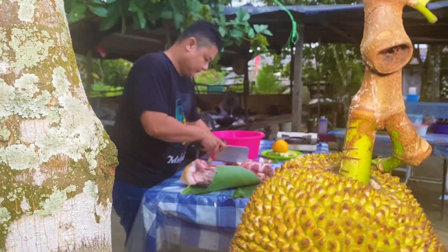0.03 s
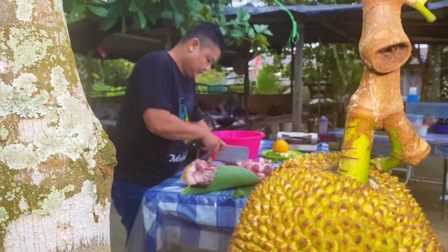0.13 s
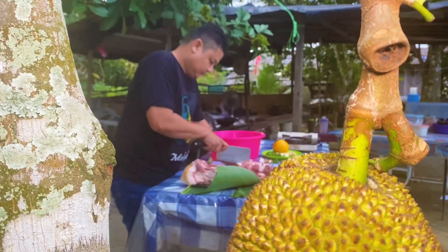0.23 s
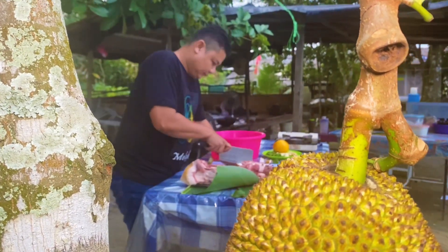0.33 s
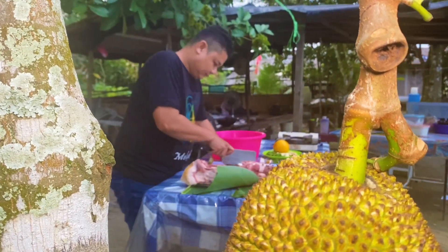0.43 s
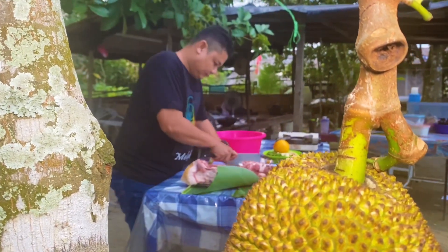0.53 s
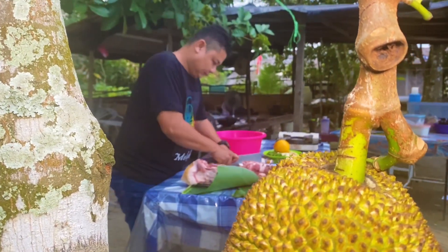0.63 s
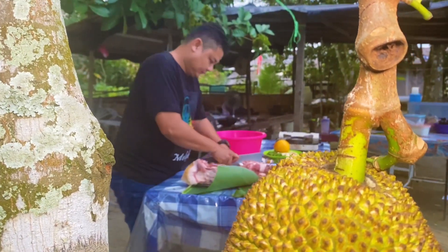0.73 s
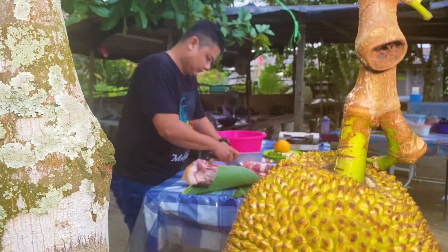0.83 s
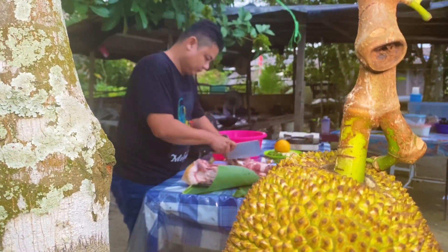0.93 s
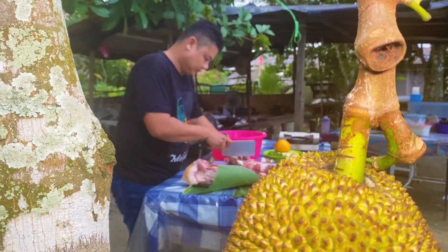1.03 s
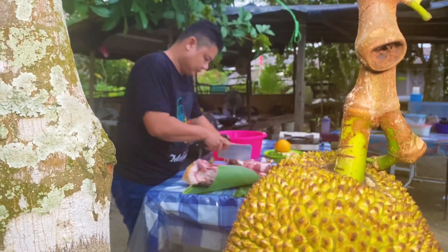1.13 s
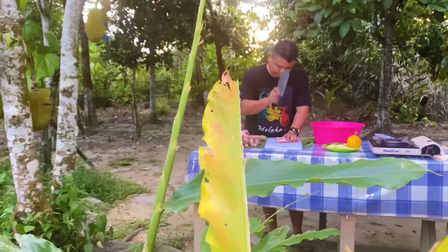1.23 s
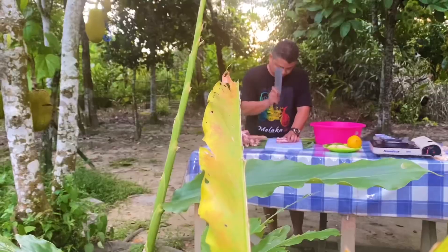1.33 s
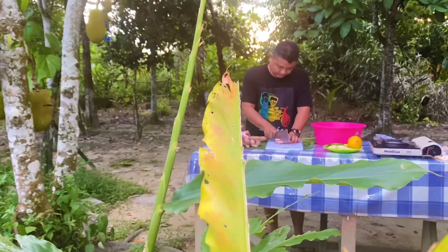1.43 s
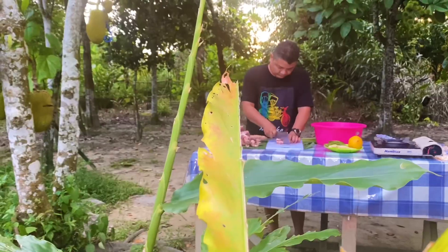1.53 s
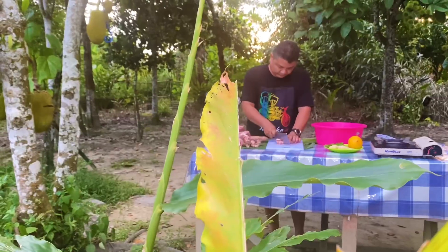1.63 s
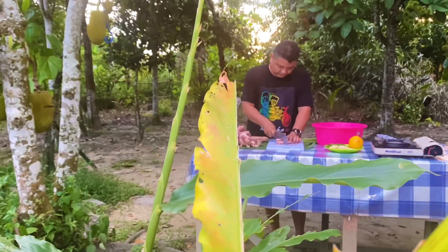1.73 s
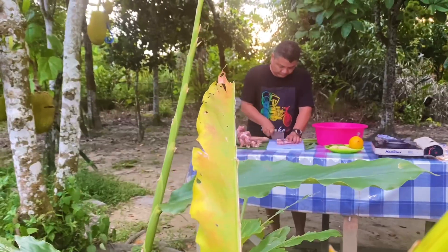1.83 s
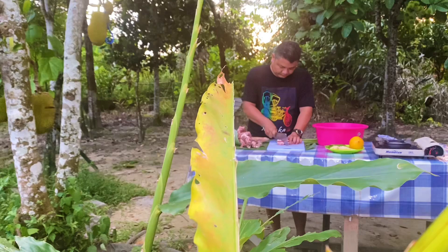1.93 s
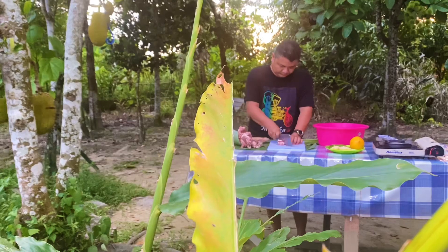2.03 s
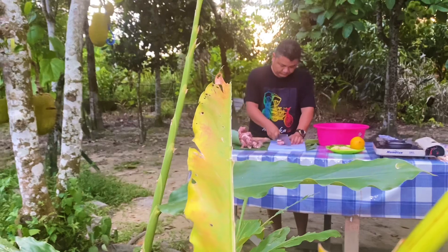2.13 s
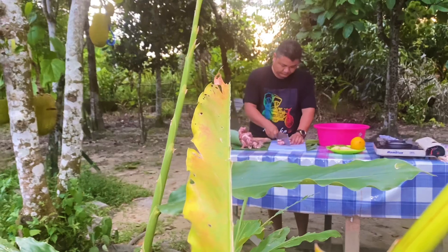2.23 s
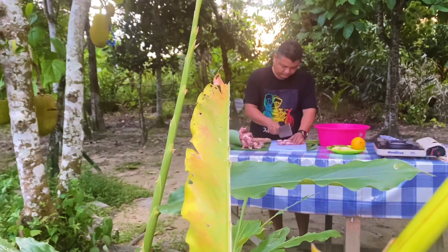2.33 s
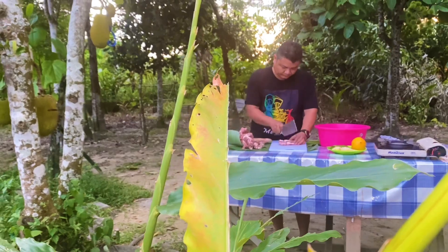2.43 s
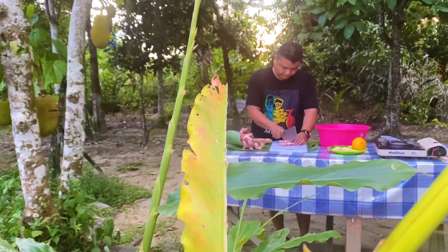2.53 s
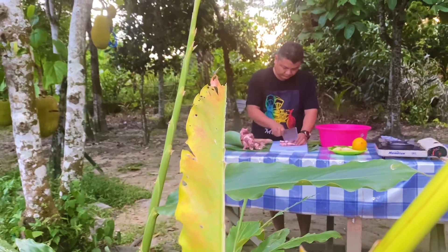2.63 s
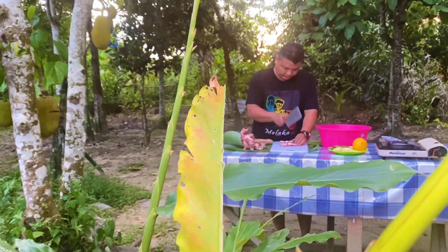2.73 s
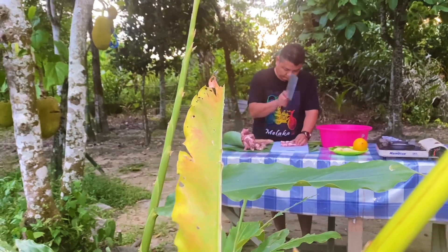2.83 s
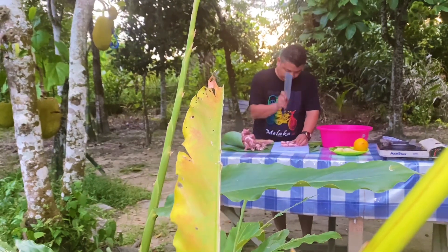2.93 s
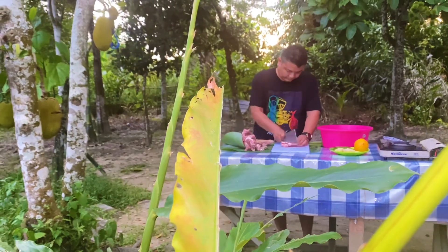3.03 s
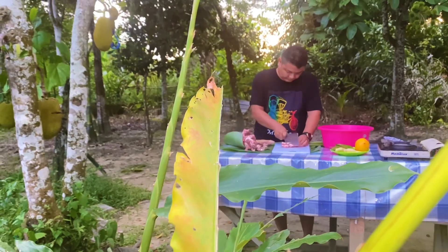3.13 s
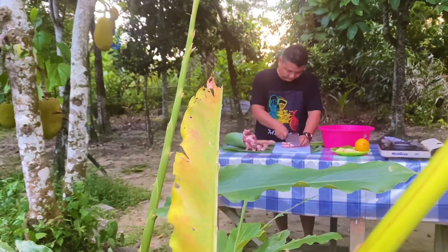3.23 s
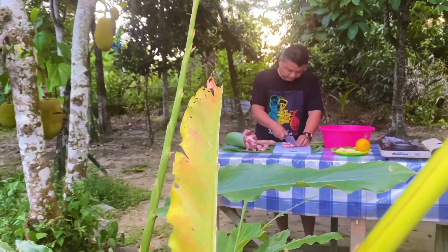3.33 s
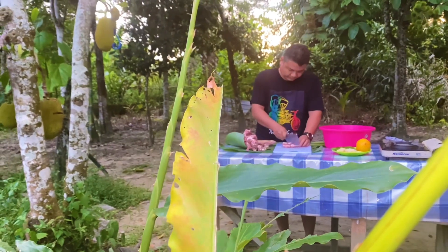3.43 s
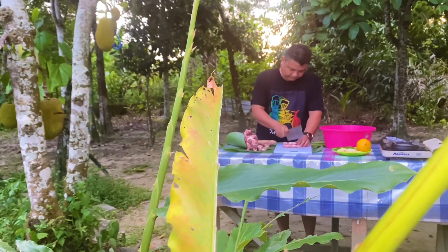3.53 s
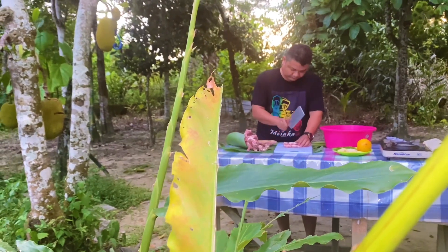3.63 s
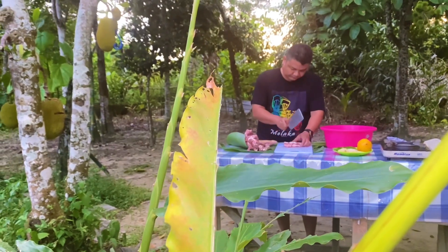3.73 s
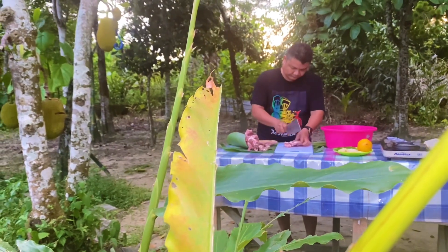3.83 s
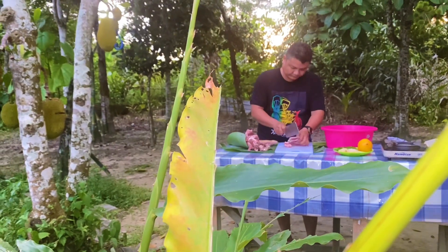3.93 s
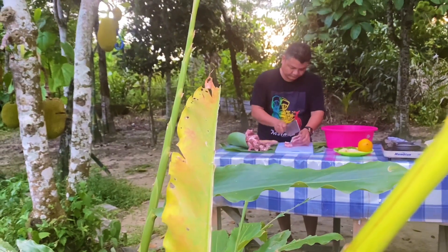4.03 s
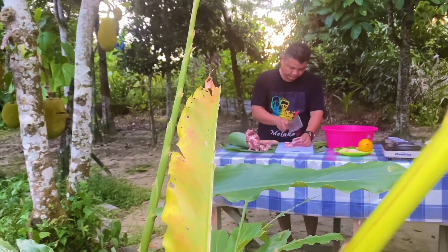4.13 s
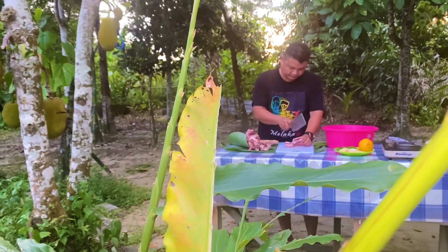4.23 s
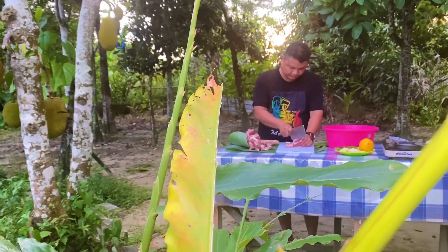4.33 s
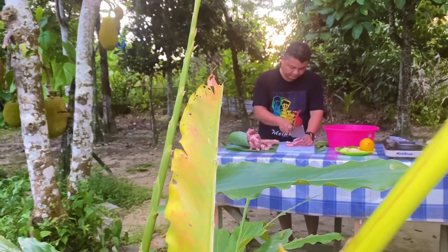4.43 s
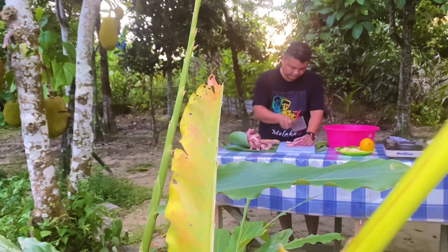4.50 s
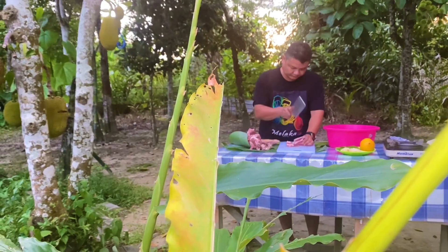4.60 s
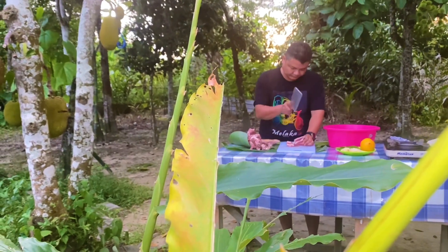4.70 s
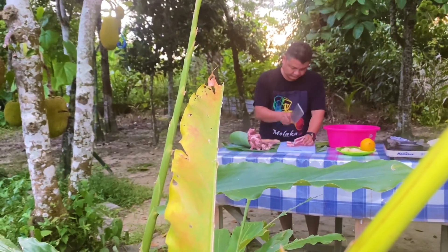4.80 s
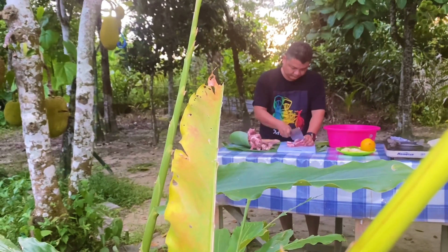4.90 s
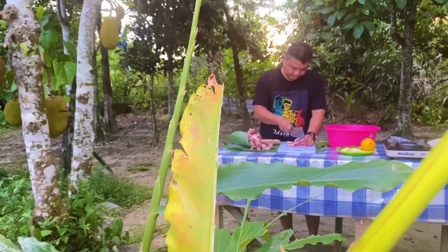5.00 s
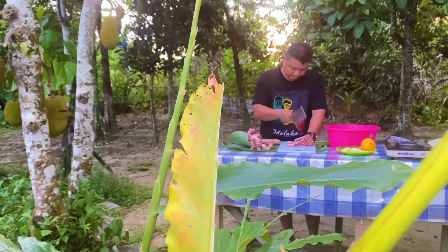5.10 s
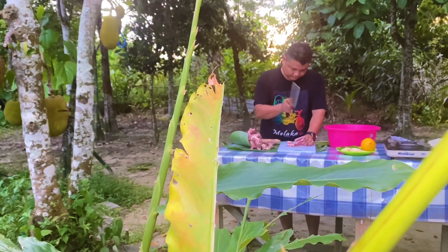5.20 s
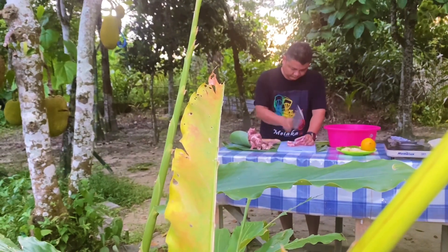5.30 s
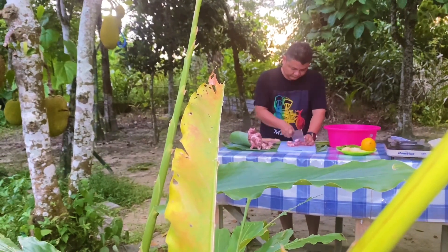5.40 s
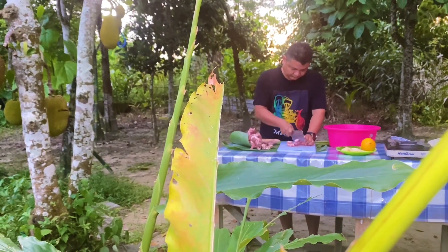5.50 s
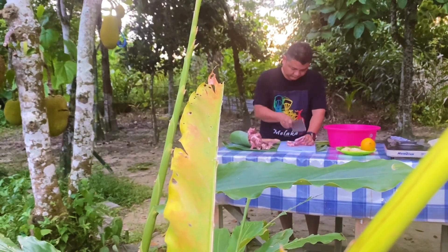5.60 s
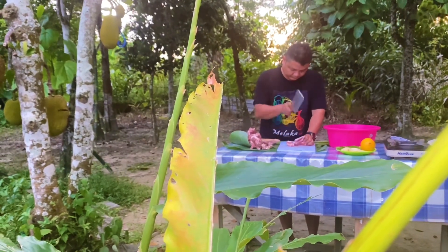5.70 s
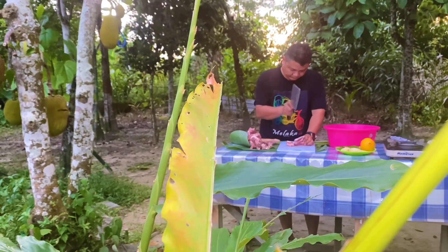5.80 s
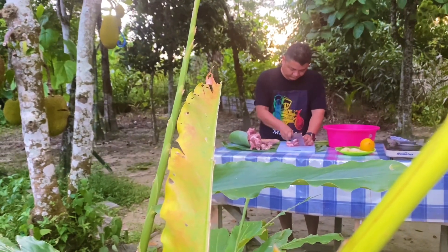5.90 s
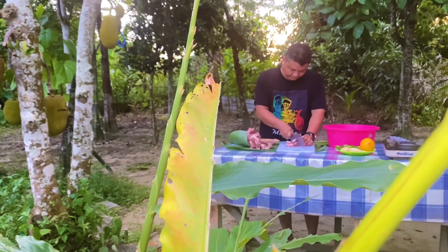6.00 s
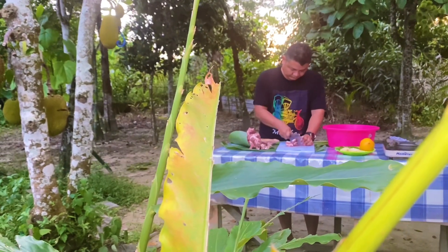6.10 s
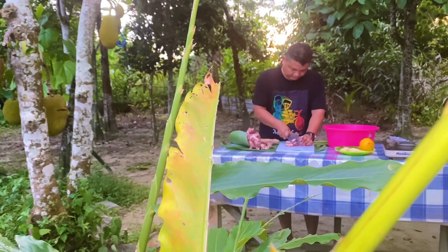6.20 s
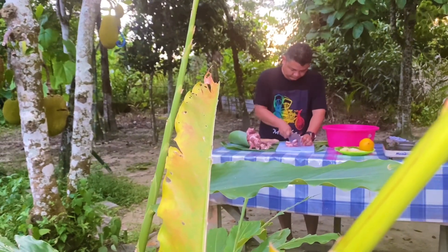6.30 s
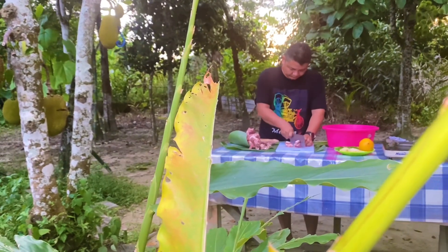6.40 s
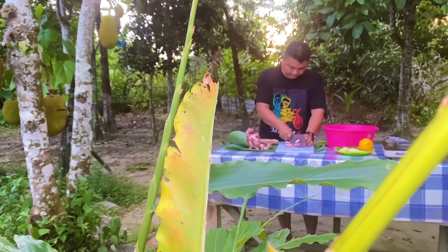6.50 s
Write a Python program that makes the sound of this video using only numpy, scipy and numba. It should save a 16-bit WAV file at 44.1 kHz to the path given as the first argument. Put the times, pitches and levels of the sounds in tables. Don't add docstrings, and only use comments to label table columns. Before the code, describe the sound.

From 0 to 1.1 s, a far engine throbs low around 100 Hz under soft air and steady insect hiss, with faint bird notes and two barely audible knife touches at 0.5 and 0.6. It stops dead; about 0.13 s of silence follows. From 1.25 the garden fades in, the engine now revving in irregular swells, especially from 1.75 to 3 and through the 3s and 4s. Close cleaver chops land at 1.46 and 3.05, very loud, bright cracks with board knock and a late table thump, then softer, thuddier ones at 5.38 and 5.92. Dishes hop and chatter for 0.1 to 0.2 s after each. Small touches tick between. A high cricket buzzes near 1.7, 2.6, 4.1, 5.0 and 6.1. Far birds call around 2.1, 3.9, 4.4 and most clearly 5.8, echoing softly among trees until the end near 6.5.

```python
import sys
import numpy as np
from scipy import signal
from scipy.fft import rfft, irfft
from scipy.io import wavfile
from scipy.ndimage import uniform_filter1d
from numba import njit

SR = 44100
rng = np.random.default_rng(int(sys.argv[2]) if len(sys.argv) > 2 else 0)


def attenuation_scalar(level_db):
    decades = np.asarray(level_db, float) / 20
    return 10 ** decades


def transcribe(signal):
    frames = np.atleast_2d(signal).T
    limited = np.clip(frames, -1, 1)
    pcm = np.round(limited * 32767).astype(np.int16)
    wavfile.write(sys.argv[1], SR, pcm)


N = 288936
T = np.arange(N) / SR
F = np.arange(N // 2 + 1) * SR / N + 1
CUT_S, RESUME_S, FADE_S = 1.111, 1.245, 0.13


@njit
def svf(x, hz, width):
    y, band, low = np.empty(len(x)), 0., 0.
    for i in range(len(x)):
        g, k = np.tan(np.pi * hz[i] / SR), width / hz[i]
        v = (band + g * (x[i] - low)) / (1 + g * (g + k))
        band, low, y[i] = 2 * v - band, low + 2 * g * v, k * v
    return y


def svf_twice(x, hz, width):
    return svf(svf(x, hz, width), hz, width)


def unit(x):
    return x / np.sqrt(np.mean(x ** 2) + 1e-30)


def on_axis(table):
    hz, value = np.transpose(table)
    return np.interp(np.log(F), np.log(hz), value)


def walk(rate_hz):
    hold = int(SR / rate_hz)
    levels = np.repeat(rng.standard_normal(N // hold + 1), hold)
    return 1.3 * uniform_filter1d(uniform_filter1d(levels, hold), hold)[:N]


def ring(x, modes):
    y = 0
    for k, (hz, width_hz, db) in enumerate(modes):
        centre = np.full(len(x), 1. * hz)
        y = y + (-1) ** k * attenuation_scalar(db) * svf_twice(x, centre, 1. * width_hz)
    return y / np.abs(y).max()


def add(out, start_s, y):
    i = int(start_s * SR)
    out[:, i:i + y.shape[-1]] += y[..., :N - i]


def ports(a, b, lead, pan, alike):
    likeness = np.sqrt(np.clip(on_axis(alike), 0, 1))
    mid = rfft(a) * np.sqrt((1 + likeness) / 2)
    side = rfft(b) * np.sqrt((1 - likeness) / 2)
    lead_rad = np.interp(F, *np.transpose(lead))
    turn = np.exp(.5j * lead_rad) * attenuation_scalar(on_axis(pan) / 2)
    return np.array([irfft((mid + side) * turn, N), irfft((mid - side) / turn, N)])


def crush(length_s, tail_db):
    t = np.arange(int(SR / 4)) / SR
    length_s = max(length_s, .001)
    attack = 1 - np.exp(-t / (0.12 * length_s))
    decay = np.exp(-(t / length_s) ** 1.42)
    echo = attenuation_scalar(tail_db) * np.exp(-t / 0.043)
    cracks = attenuation_scalar(1.76 * np.repeat(rng.standard_normal(len(t) // 40 + 1), 40)[:len(t)])
    return attack * (decay + echo) * cracks * rng.standard_normal((2, len(t)))


def contact(out, start_s, db, length_s, tail_db, parts):
    force = crush(length_s, tail_db)
    for rel_db, modes in parts:
        struck = np.array(modes) * (1 + [.03, 0, 0] * rng.standard_normal((len(modes), 1)))
        body = np.array([ring(f, struck) for f in force])
        add(out, start_s - .001, attenuation_scalar(db + rel_db) * body)


# thump_db, knock_db, hiss_db
BLOWS = [(1.4568, -13.5, 11, 6, -7), (1.4612, -3.5, -1, -4, -17), (1.483, -12, 0.5, -13, -12.5),
         (3.0488, -21, 6, -3, -1), (3.054, -4.5, 2, -0.5, -13.5), (3.064, -8, -24, -8, -18),
         (3.0758, -9.5, 2, -15, -15.5), (4.9146, -26, 10, 4.5, -11), (5.3728, -24, 8.5, 0.5, 0),
         (5.3851, -22.5, 10, 1, -15), (5.4, -24.5, 12.5, 2.5, -12), (5.922, -21, 4, -0.5, -6),
         (5.9272, -19, 10, 0.5, -5), (5.9523, -26.5, 8, 0, -27.5)]
# pitch_hz, width_hz, level_db
TABLE_MODES = [(62, 37, -1.5), (123.3, 71, -0.5), (153.6, 64, 3.5), (238.7, 58, 5.5), (321, 69, -5),
               (98, 21.5, -4)]
BOARD_MODES = [(403, 101, 0), (575, 156, -3), (756, 210, 1.5), (853, 364, 0), (977, 380, -8.5)]
BLADE_MODES = [(946, 390, 2.5), (1405, 230, 5.5), (1500, 243, 4), (1650, 240, 3), (1950, 230, 2),
               (2245, 290, 1), (2630, 600, -7.5), (3400, 1250, -10.5)]
HISS_MODES = [(4735, 1960, 8), (6220, 1470, 7.5), (6880, 5800, 4), (11060, 10000, 2.5), (13200, 4600, 0.5)]


def blows(out):
    t = np.arange(int(SR / 4)) / SR
    thump = ring(t / .002 * np.exp(-t / 0.00084), TABLE_MODES)
    table_lag_s = 0.00454
    for start_s, db, thump_db, knock_db, hiss_db in BLOWS:
        length_s = .0135 * (1 + .02 * db)
        parts = [(0, BLADE_MODES), (knock_db + 2.0, BOARD_MODES), (hiss_db + 5.5, HISS_MODES)]
        contact(out, start_s, db, length_s, -14, parts)
        add(out, start_s + table_lag_s, attenuation_scalar(db + thump_db) * thump)


# knock_db, hiss_db
TOUCHES = [(0.5205, -51.5, 6.5, 2), (0.6155, -46, 2.5, -3), (1.945, -46, 2, -7), (2.534, -41.5, -2, -2.5),
           (2.5579, -44, -4, 2), (3.823, -40, -4.5, -9), (4.366, -45, 6, 3.5), (4.3744, -41, -24, -22),
           (4.4785, -53, -14, 0), (4.938, -37, -16, -9), (4.95, -44, -17, -12), (4.9797, -49, -16, -23)]
# start_s, peak_db, hiss_over_peak_db
HOPS = [(1.5244, -38, 1), (1.5757, -24.5, -7.5), (1.587, -31.5, 1), (1.603, -35, 4), (1.6143, -23.5, -2.5),
        (3.162, -23, -7.5), (3.174, -34.5, 6.5), (5.4564, -33.5, -11), (5.476, -25.5, -10),
        (5.5146, -40, -18), (6.0252, -26.5, -7)]
# start_s, end_s, level_db
CHATTER = [
    (1.621, 1.63, -23),
    (3.184, 3.245, -30.5),
    (5.485, 5.53, -38),
    (6.034, 6.103, -35.5),
]
# pitch_hz, width_hz, level_db
DISH_MODES = [(923, 400, 3), (1095, 810, -1.5), (1650, 265, 6), (2020, 230, 10.5), (2500, 820, -3),
              (3260, 740, -5)]


def landings(out):
    touch_s, hop_s, hop_knock_db = .006, .0065, -19
    events = [(*row, touch_s) for row in TOUCHES]
    events += [(s, db, hop_knock_db, hiss_db, hop_s) for s, db, hiss_db in HOPS]
    gap_s, scatter_db, chatter_hiss_db = .0125, 2.2, -16
    for begin_s, end_s, db in CHATTER:
        for k, (late, strong) in enumerate(rng.standard_normal((8, 2))):
            start_s = begin_s + gap_s * (k + 0.13 * late)
            if start_s < end_s:
                events.append((start_s, db + scatter_db * strong, hop_knock_db, chatter_hiss_db, touch_s))
    for start_s, db, knock_db, hiss_db, length_s in events:
        parts = [(0, DISH_MODES), (knock_db + 3.5, BOARD_MODES), (hiss_db, HISS_MODES)]
        contact(out, start_s, db + 3.0, length_s, -15.5, parts)


# pitch_hz, left_lead_rad
CHOP_LEAD = [(0, 0), (1720, -0.8), (3100, 0.4), (3530, -0.1), (6370, 0.2), (9730, -6.0), (15300, -14.8)]
# pitch_hz, left_minus_right_db
CHOP_PAN = [ (60, -0.5), (380, -1.0), (700, -2.5), (1290, -2.0), (2380, -0.5), (4400, 1.5), (8120, 0.5),
            (15000, 0.0)]
# pitch_hz, likeness [0-1]
CHOP_ALIKE = [(60, 0.97), (300, 0.98), (1000, 0.59), (3000, 0.26), (6000, 0.14), (12000, 0.55)]


def chops():
    out = np.zeros((2, N))
    blows(out)
    landings(out)
    return ports(*out, CHOP_LEAD, CHOP_PAN, CHOP_ALIKE)


# start_s, length_s, strength_over_coasting_db
REVS = [(1.745, 0.26, 17), (2.05, 0.078, 11), (2.469, 0.12, 19), (2.616, .12, 8), (2.82, .22, 21),
        (3.329, 1.066, 11), (3.472, .12, 14), (3.716, .2, 17.5), (4.195, 0.15, 17), (4.456, .15, 7),
        (4.765, .2, 11.5), (6.327, 0.33, 7)]


def throttle():
    attack_s, release_s = .05, .08
    openings = []
    for start_s, length_s, db in REVS:
        rise = (T - start_s) / attack_s
        fall = 1 + (start_s + length_s - T) / release_s
        openings.append(db * np.clip(np.minimum(rise, fall), 0, 1))
    return np.max(openings, 0)


def lope():
    turn = 2 * np.pi * (T - .025) / .0795
    return (T < CUT_S) * (6.5 * np.cos(turn) + 3 * np.cos(turn / 2))


def steep(x, hz, width):
    return unit(svf(svf_twice(x, hz, width), hz, width))


def drone(hz, waver, flutter_db):
    phase = 2 * np.pi * np.cumsum(hz * (1 + waver * walk(40))) / SR
    return attenuation_scalar(flutter_db * walk(35)) * np.sqrt(2) * np.sin(phase)


# start_s, exhaust_note_hz, note_db
ENGINE = [(0, 100, -42.5), (1.102, 101, -45.5), (1.299, 94, -40.5), (1.56, 98, -28.5), (1.7, 100, -36.5),
          (2.0, 112, -33), (2.112, 103, -27), (2.301, 108, -39), (2.44, 101, -31.5), (2.55, 104, -32),
          (2.752, 96, -30), (3.3, 104, -33.5), (4.06, 114, -37.5), (4.27, 115, -32), (4.601, 112, -40),
          (4.92, 116, -29), (5.07, 112, -49.5), (6.55, 110, -43)]
# coasting_over_mean_note_db, share_of_note [dB/dB], share_of_throttle [dB/dB]
RUMBLE_LAW = (-5.5, 1, 0.33)
BOX_LAW = (-15.5, 0.3, 0.59)
BARK_LAW = (-35, 0.2, 1.39)


def engine():
    start_s, coast_hz, coast_db = np.transpose(ENGINE)
    throttle_db = throttle()
    coast_hz = np.interp(T, start_s, coast_hz)
    note_hz = coast_hz + 0.65 * throttle_db
    note_db = np.interp(T, start_s, coast_db) + lope()
    box_hz = 1.95 * coast_hz + 42.35 * np.tanh(throttle_db / 6.5) ** 2

    def layer_amp(law):
        mean_db = -33.5
        db, note_share, throttle_share = law
        return attenuation_scalar(mean_db + db + note_share * (note_db - mean_db) + throttle_share * throttle_db)

    cycle = np.cumsum(note_hz / 3 * (1 + .03 * walk(30))) / SR
    firing = np.diff(np.floor(cycle), prepend=0) * attenuation_scalar(7.1 * rng.standard_normal(N))
    drive = unit(firing) + 3.15 * rng.standard_normal(N)
    near = attenuation_scalar(note_db) * drone(note_hz, 0.059, 3.96)
    near += layer_amp(BOX_LAW) * drone(box_hz, 0.0452, 3.15)
    near += layer_amp(RUMBLE_LAW) * steep(drive, 1.1 * note_hz, 164.6)
    near += layer_amp(BARK_LAW) * steep(drive, np.full(N, 385.), 147.0)
    return irfft(rfft(near) / np.sqrt(1 + (F / 460) ** 16), N)


# start_s, end_s, level_db
CRICKET = [
    (1.697, 2.018, -50),
    (2.593, 2.988, -48.5),
    (4.101, 4.49, -47.5),
    (5.003, 5.374, -48),
    (5.722, 5.897, -72),
    (6.06, 6.442, -46.5),
]


def cricket():
    stroke = 98 * T % 1
    hz = 9300 * (1.04 - 0.037 * stroke) + 60 * walk(160)
    song = np.sin(np.pi * stroke) ** 2 * np.sin(2 * np.pi * np.cumsum(hz) / SR)
    level = np.zeros(N)
    for start_s, end_s, db in CRICKET:
        swell = np.clip((T - start_s) / (0.19 * (end_s - start_s)), 0, 1)
        level += attenuation_scalar(db) * swell * (T < end_s)
    return song * level


# start_s, end_s, start_hz, end_hz, level_db
BIRDS = [
    (.02, .1, 1814, 1746, -58.5),
    (0.349, 0.497, 2230, 2500, -64),
    (2.1, 2.304, 1950, 1690, -56.5),
    (2.11, 2.281, 3620, 3460, -64),
    (3.9, 4.19, 1650, 1630, -56),
    (4.355, 4.55, 2420, 2080, -56),
    (5.78, 6.06, 1582, 1693, -50.5),
    (6.03, 6.274, 1662, 1725, -57.5),
    (6.18, 6.55, 1403, 1374, -59),
]
# start_s, end_s, start_hz, end_hz, level_db
WHISTLES = [
    (3.858, 3.885, 4594, 5590, -55),
    (3.88, 3.936, 5650, 5720, -61),
    (4.51, 4.56, 4130, 3400, -66),
    (5.794, 5.85, 5420, 3986, -56.5),
    (5.841, 5.888, 3876, 3150, -63),
]
# start_s, end_s, start_hz, end_hz, level_db
RASPS = [
    (3.94, 4.0, 3700, 3000, -58.5),
    (3.87, 3.91, 3200, 3600, -60.5),
    (1.71, 1.856, 5130, 4700, -56.5),
    (1.758, 2.044, 1430, 1560, -57),
    (6.251, 6.547, 2080, 1740, -63),
]


def birds():
    out, waver = np.zeros((1, N)), 1 + 0.015 * walk(25)
    for table, hoarse_hz in ((BIRDS, 196.), (WHISTLES, 110.), (RASPS, 930.)):
        for start_s, end_s, from_hz, to_hz, db in table:
            u = np.linspace(0, 1, int((end_s - start_s) * SR))
            hz = (from_hz + (to_hz - from_hz) * u) * waver[int(start_s * SR):][:len(u)]
            call = unit(svf_twice(rng.standard_normal(len(u)), hz, hoarse_hz))
            swell = np.clip(np.minimum(u, 1 - u) / 0.14, 0, 1)
            add(out, start_s, attenuation_scalar(db) * call * swell)
    calls = out[0]
    echoes = sum(attenuation_scalar(-10.0 - 60 * lag_s) * np.roll(calls, int(lag_s * SR)) for lag_s in (.017, .031, .052, .08))
    return calls + echoes


# pitch_hz, width_hz, first_scene_db, second_scene_db
CHOIR = [(4690, 240, -63.5, -65), (5040, 750, -66, -68), (6850, 890, -62.5, -66), (7890, 750, -64, -66.5),
         (9310, 3000, -62.5, -63), (13600, 2800, -72, -73)]


def insects():
    out = np.zeros(N)
    for hz, width_hz, first_db, second_db in CHOIR:
        band = unit(svf_twice(rng.standard_normal(N), np.full(N, 1. * hz), 1. * width_hz))
        level_db = np.where(T < RESUME_S, first_db, second_db)
        out += attenuation_scalar(level_db + 1.0 * walk(3.64) + 0.96 * walk(4.5)) * band
    return out


# pitch_hz, density_db [dB per Hz]
AIR = [
    [(25, -17.5), (101, -7.5), (265, -17), (310, -33), (807, -33), (2130, -39), (3650, -47.5), (15600, -58)],
    [ (25, -24.5), (104, -5), (265, -21), (320, -34), (2100, -42.5), (3300, -48), (12300, -60), (14000, -61)],
]
AIR_DB = -43, -39


def air():
    beds = []
    for curve, db in zip(AIR, AIR_DB):
        noise = irfft(rfft(rng.standard_normal(N)) * attenuation_scalar(on_axis(curve)), N)
        beds.append(attenuation_scalar(db) * unit(noise))
    return np.where(T < RESUME_S, *beds)


# pitch_hz, left_lead_rad
AIR_LEAD = [(0, 0), (1120, -0.5), (3100, 1.5), (5000, 0), (6630, 2.94), (8790, -8), (10900, -4.5),
            (15300, -19)]
# pitch_hz, left_minus_right_db
AIR_PAN = [ (60, 0), (200, -0.7), (380, -1.9), (700, 0.5), (1290, -1), (4400, 3), (8120, 0.04),
           (15000, 0.0)]
# pitch_hz, likeness [0-1]
AIR_ALIKE = [ (60, 1), (130, 0.77), (290, 0.32), (640, 0.041), (1410, 0.0057), (3100, 0.22), (6820, 0.0116),
             (15000, 0.028)]


def scene():
    calls = birds()
    fade = np.where(T < CUT_S, 1, np.clip((T - RESUME_S) / FADE_S, 0, 1) ** 0.88)
    gate = np.clip(np.maximum(CUT_S - T, T - RESUME_S) / 0.0032, 0, 1)
    a = fade * (air() + insects() + calls) + gate * engine()
    b = fade * (air() + insects() + np.roll(calls, 300)) + gate * engine()
    garden = ports(a, b, AIR_LEAD, AIR_PAN, AIR_ALIKE) * gate
    buzz = cricket()
    return garden + chops() + np.array([buzz, np.roll(buzz, 3)])


def roll_off(x):
    return signal.sosfilt(signal.butter(12, 15780, fs=SR, output="sos"), x)


# pitch_hz, width_hz, depth_db
DIPS = [(8600, 177, -20), (12270, 650, -20), (16600, 420, -29), (0, 22.4, -40)]


def record(dry):
    dips_db = sum(db * np.exp(-((F - hz) / width_hz) ** 2) for hz, width_hz, db in DIPS)
    heard = irfft(rfft(dry) * attenuation_scalar(dips_db), N)
    mix = np.tanh(0.75 * heard) / 0.85
    return roll_off(mix)


dry = scene()
out = record(dry)
transcribe(out)
```